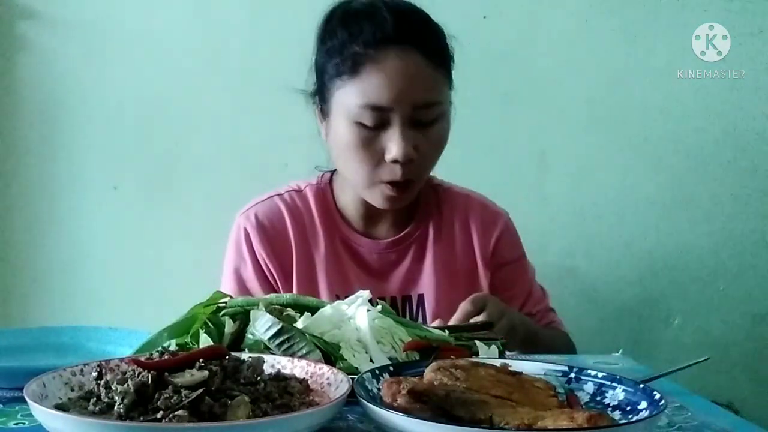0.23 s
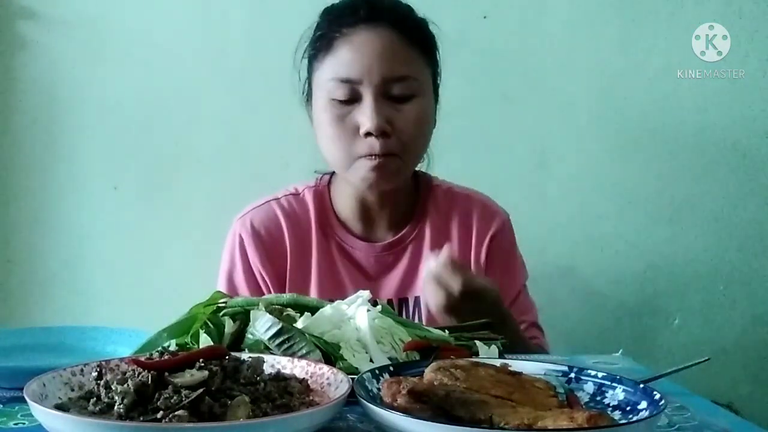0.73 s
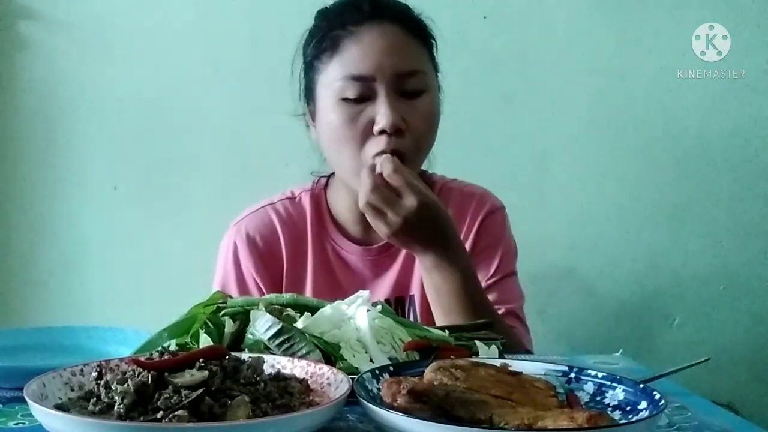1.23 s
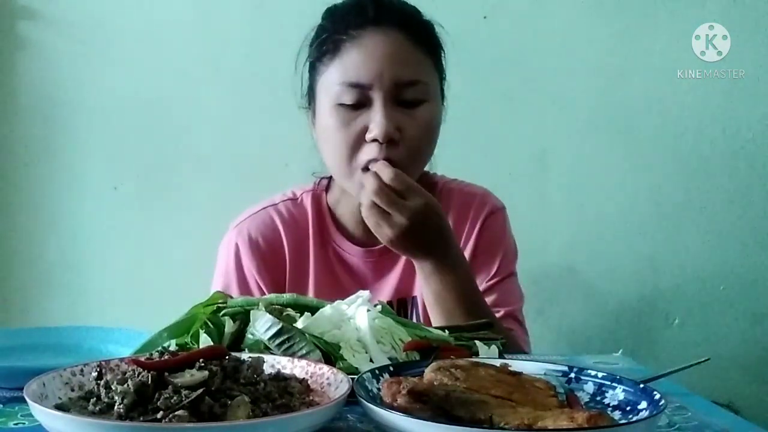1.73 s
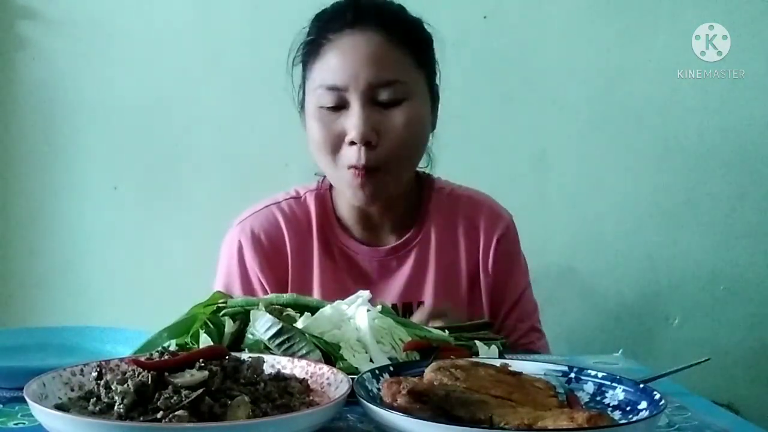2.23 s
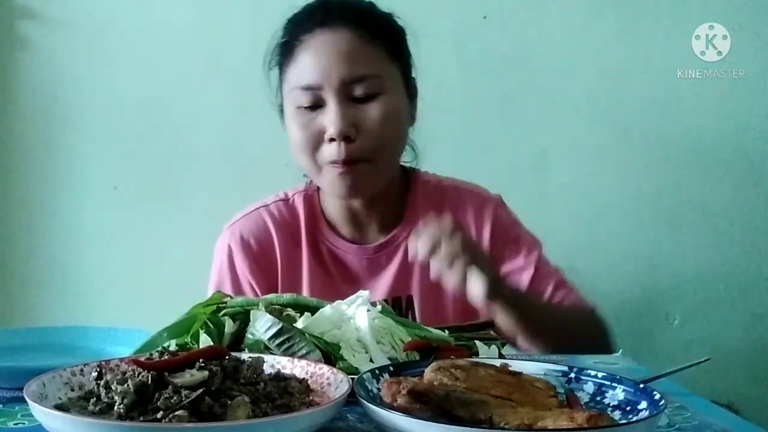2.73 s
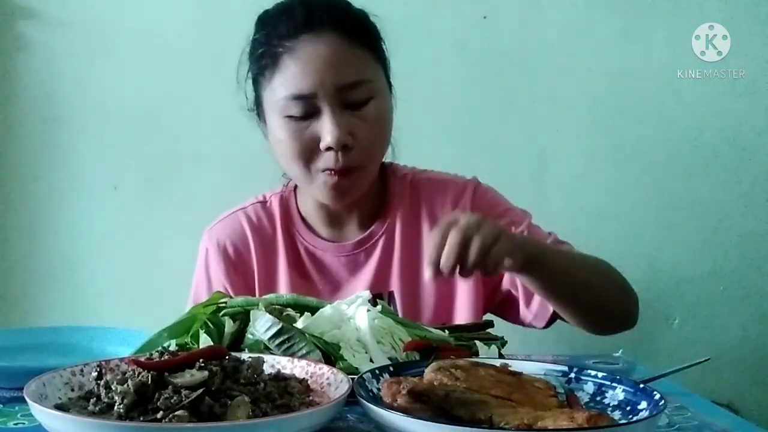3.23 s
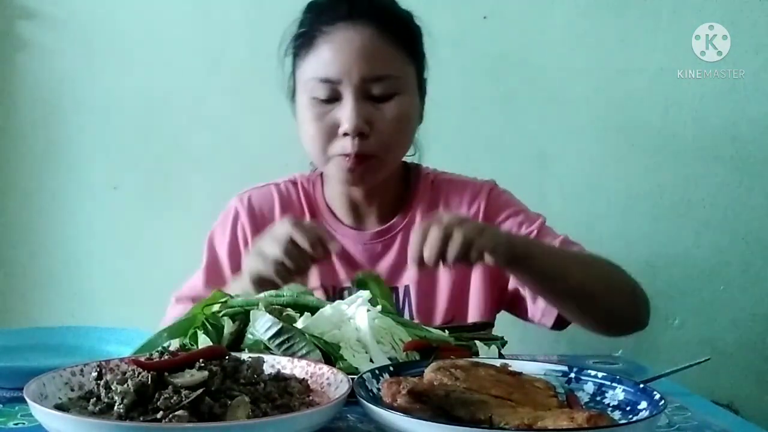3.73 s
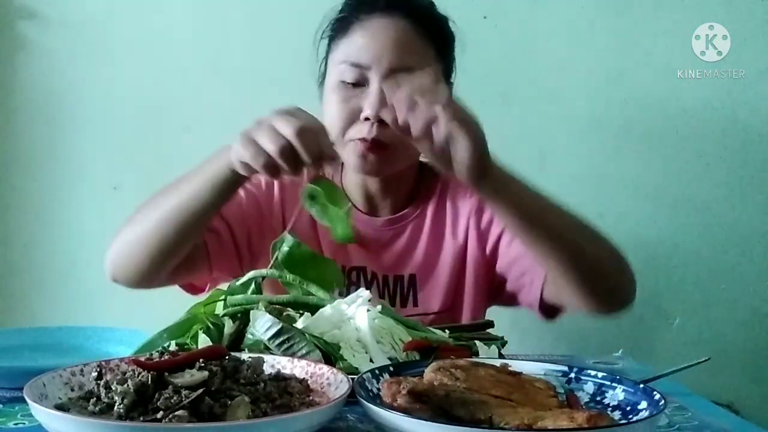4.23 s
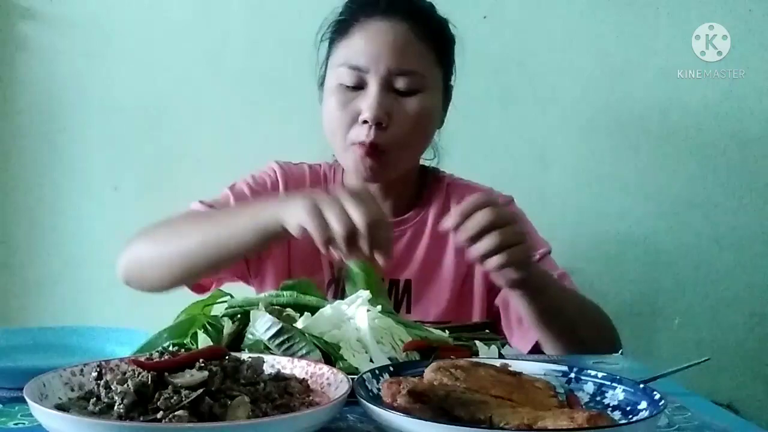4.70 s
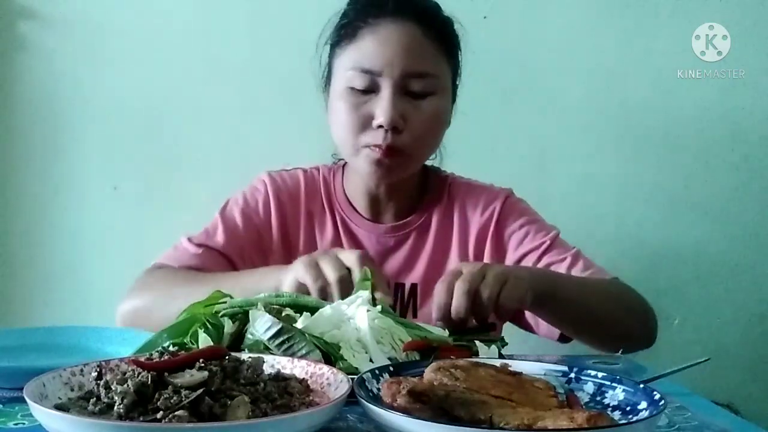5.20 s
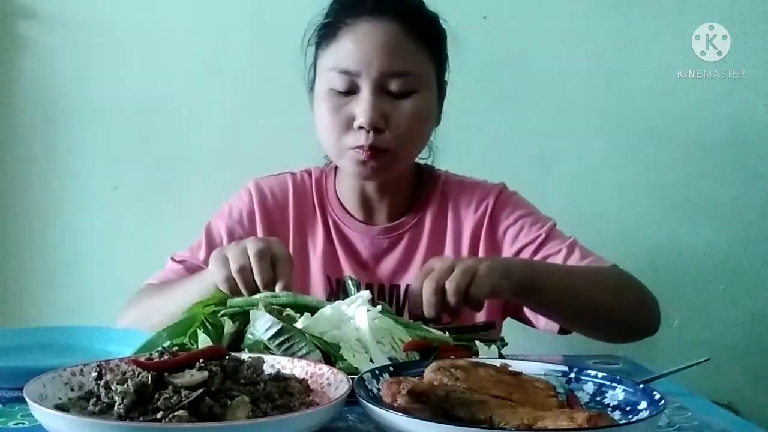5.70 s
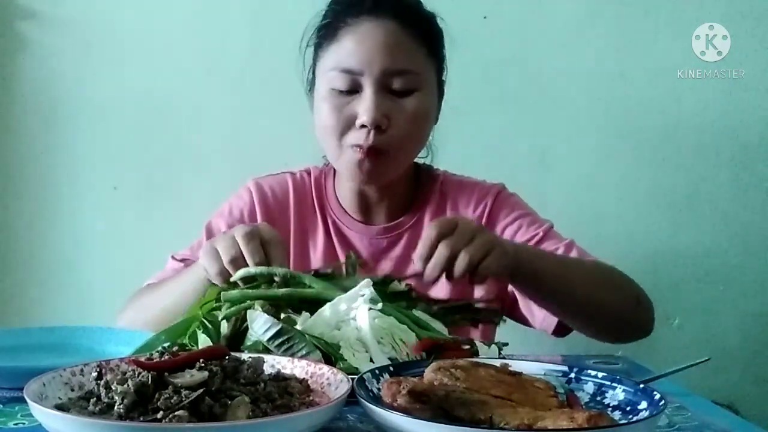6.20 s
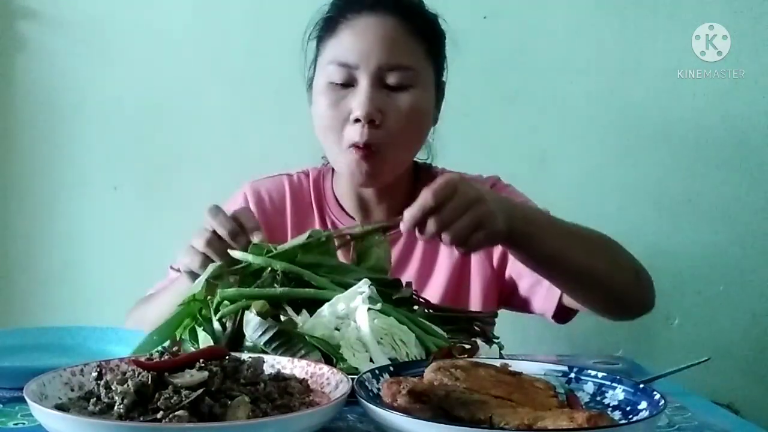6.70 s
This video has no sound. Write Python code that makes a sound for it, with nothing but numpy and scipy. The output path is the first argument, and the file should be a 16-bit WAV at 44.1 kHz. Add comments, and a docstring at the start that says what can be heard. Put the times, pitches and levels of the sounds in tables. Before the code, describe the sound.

Low outdoor air and a faint boomy engine open the scene, with one sharp click. The engine swells, eases, swells harder, then drops to a slow, lumpy idle coming through the walls. Leaves are brushed softly at a table, with tiny ticks and scuffs. Distant birds give thin rising slurs and hoarse falling calls. Small-room stereo pickup, quiet with gentle hiss.

```python
"""A small room, with a single-cylinder engine some way off outdoors: two swelling pulls, then it lets go and idles.
Each firing sums its orders to a boom through the walls, under a buzz of pipe overtones and puffs of gas noise.
A sharp click, soft ticks, a thin bird note and brief scuffs are damped pulses with a little noise.
Leaves rustle as strokes of shaped noise; far-off small birds whistle as gliding sines or rasp as falling noise bands.
Two ringing microphone ports pick it all up over outdoor air and a soft hiss, both shaped noise."""
import sys
import numpy as np
from scipy import signal
from scipy.fft import rfft, irfft, next_fast_len
from scipy.io import wavfile
from scipy.ndimage import uniform_filter1d, map_coordinates

SR = 44100
rng = np.random.default_rng(int(sys.argv[2]) if len(sys.argv) > 2 else 0)


def store_wav(level_fs):
    """Save 16-bit WAV to argv[1]."""
    pcm = np.round(np.clip(np.atleast_2d(level_fs), -1, 1) * 32767)
    wavfile.write(sys.argv[1], SR, pcm.T.astype(np.int16))


N = 306495
T = np.arange(N) / SR  # s


def amp(db):
    """Decibels to gain."""
    return 10 ** (np.asarray(db) / 20)


def unit(x):
    """Scale to rms 1."""
    return x / np.sqrt(np.mean(x ** 2) + 1e-20)


def steady(x):
    """Hold a stereo sound at rms 1 over quarter seconds."""
    power = uniform_filter1d(np.mean(x ** 2, axis=0), SR // 4)
    return x / np.sqrt(np.abs(power) + 1e-20)


def along(points, hz):
    """Read (f/Hz, value) points on a log frequency axis."""
    f, v = np.transpose(points)
    return np.interp(np.log(hz + 1), np.log(f + 1), v)


def curves(rows):
    """One value per sample for each column after the time."""
    s, *cols = np.transpose(rows)
    return [np.interp(T, s, c) for c in cols]


def wobble(rate):
    """A smooth random curve, rate knots a second."""
    knots = rng.standard_normal(int(N * rate / SR) + 4)
    return map_coordinates(knots, [T * rate + 1], order=2)


def swell(centre, length):
    """A rounded rise and fall."""
    return np.sqrt(np.clip(1 - (2 * (T - centre) / length) ** 2, 0, 1))


def filtered(x, response):
    """Filter x by a complex response of frequency."""
    m = next_fast_len(N + SR // 2)
    return irfft(rfft(x, m) * response(np.fft.rfftfreq(m, 1 / SR)), m)[..., :N]


def from_right(x):
    """Sound from outside reaches the right port first."""
    lag = 19 / SR  # s, left behind right
    sides = np.array([[1], [-1]])
    return filtered(x, lambda hz: np.exp(-1j * np.pi * hz * lag * sides))


def rush(spectrum):
    """Stereo noise of rms 1, alike in the bass and unrelated in the treble."""
    # Likeness of the two ports: f/Hz, correlation 0-1
    likeness = [(170, 0.95), (260, 1), (550, 0.97), (1200, 0.4), (2400, 0.37), (4000, 0.09), (7000, 0)]

    def mid_side(hz):
        turn = np.arccos(np.clip(along(likeness, hz), -1, 1)) / 2
        return amp(along(spectrum, hz)) * [np.cos(turn), np.sin(turn)]

    mid, side = filtered(rng.standard_normal((2, N)), mid_side)
    return unit(np.array([mid + side, mid - side]))


def coloured(x):
    """The room's many standing waves ripple the spectrum, differently at each port."""
    depth_db, spacing_hz = 2.6, 22
    knots = rng.standard_normal((2, SR // 8))
    grid = np.arange(knots.shape[1]) * spacing_hz

    def ripple(hz):
        random_db = depth_db * np.array([np.interp(hz, grid, row) for row in knots])
        return amp(random_db * np.clip(hz / 600, 0, 1))  # full depth from 600 Hz up

    return filtered(x, ripple)


def room(x):
    """The room's diffuse answer at both ports: decaying noise at the energy of x, after about 9 ms."""
    # Decay time of the room: f/Hz, t60/s
    decay = [(120, 0.27), (1000, 0.6), (3000, 0.39), (10000, 0.31)]
    hz, t, z = signal.stft(rng.standard_normal((2, SR // 2)), SR, nperseg=256)
    fading = z * amp(-60 * t / along(decay, hz)[:, None])
    tail = signal.istft(fading, SR, nperseg=256)[1]
    delayed = np.pad(x, (SR // 110, 0))[None]
    return signal.fftconvolve(delayed, tail / np.linalg.norm(tail[0]), axes=1)[:, :N]


def boom(cycle, speed, shake_db=0.6, echo_shake_db=1.04, boom_db=-0.46, skirt=1.62):
    """The silencer rings once per firing: the orders inside its band add up to a thump, which a wall repeats."""
    # The boom through the walls, which keep shifting its band, before trim and wall repeat:
    # t/s, level/dB, centre/Hz, half-width/Hz
    band = [(0.0, -39.5, 119, 27), (0.5, -41.5, 136, 18), (1.25, -41.5, 115, 52), (1.55, -31.5, 115, 7.3),
            (1.85, -27.5, 119, 7.6), (2.1, -32.5, 108, 17), (2.3, -36.5, 119, 47), (2.52, -36, 118.5, 25),
            (2.9, -26.5, 120, 11.2), (3.25, -25, 127.2, 10), (3.6, -25.5, 135.4, 8.9),
            (3.76, -27.5, 109, 9.7), (3.85, -31, 100, 11), (3.93, -38, 113, 81), (4.1, -29.5, 118, 19),
            (4.42, -28.5, 124, 30), (4.76, -32.5, 114.4, 27), (5.15, -28, 127.6, 58),
            (5.6, -27, 117.6, 13.3), (6.1, -31, 112, 39), (6.45, -31, 108.4, 14.8), (6.95, -29, 112, 13)]
    direct_db, all_echo_db = -31, -34.5  # the fainter the boom, the more of it is echo
    smear_rad = .45  # phase spread of the orders when it is all echo
    from_hz = 61  # the silencer radiates little below this
    wall_s, wall_db, wall_drift_s = 0.01816, -9.5, 0.0021  # delay, level, wander of the delay
    level_db, centre, width = curves(band)
    echo = np.clip((direct_db - level_db) / (direct_db - all_echo_db), 0, 1)
    orders = np.arange(3, 9)[:, None]  # multiples of the firing rate
    gains = 1 / (1 + np.abs((orders * speed - centre) / width) ** skirt)
    gains = gains / (1 + (from_hz / (orders * speed)) ** 6)
    # echoes delay the orders unequally around the band's centre, which widens each thump and makes it uneven
    spread = smear_rad * echo ** 2 * (orders - centre / speed) ** 2
    partials = gains * np.cos(2 * np.pi * orders * cycle + spread)
    thumps = -np.sqrt(2) * np.sum(partials, axis=0) / np.linalg.norm(gains, axis=0)
    wall = amp(wall_db) * np.interp(T - wall_s - wall_drift_s * wobble(1.995), T, thumps)
    shake = (shake_db + echo_shake_db * echo) * wobble(18)
    return (thumps + wall) * amp(level_db + boom_db + shake)


def pipe(hz, load):
    """Gain of the exhaust pipe's resonances along a pitch curve; the throttle shifts their balance."""
    # Resonances above the boom: centre/Hz, width/Hz, level under load/dB, level at idle/dB
    resonances = [(170, 16, -5, -8), (217, 24, -14, 3), (257, 18, 0, -14), (276, 18, -18, -1),
                  (335, 24, -5, -12), (362, 26, -14, -8), (400, 18, -4, -28), (432, 20, -22, -14),
                  (472, 24, -3, -12), (505, 20, -13, -22), (541, 22, -4, -10), (585, 35, -28, -13),
                  (640, 50, -14, -17), (705, 30, -14, -28), (790, 45, -12, -15)]
    grid = np.arange(SR // 20)  # Hz
    power = 0
    for centre, width, loaded_db, idle_db in resonances:
        power = power + amp([[loaded_db], [idle_db]]) ** 2 / (1 + (2 * (grid - centre) / width) ** 2)
    loaded, idle = np.sqrt(power)
    return load * np.interp(hz, grid, loaded) + (1 - load) * np.interp(hz, grid, idle)


def overtones(cycle, speed, load, orders, waver_db=4.5, port_db=1.25, drift=0.18, idle_drift=0.47, apart=0.22):
    """Higher orders sweep through the pipe's resonances; shifting echoes make each fade on its own."""
    # A resonance that wanders over the overtones: t/s, centre/Hz
    upper_hollow = [(1.5, 464), (1.95, 360), (2.15, 515), (2.55, 520), (2.85, 463), (3.25, 486),
                    (3.55, 351), (3.9, 370), (4.15, 497), (4.35, 552), (4.75, 560), (4.95, 480),
                    (5.45, 466), (5.85, 548), (6.5, 573)]
    # A second one, lower down: t/s, centre/Hz
    lower_hollow = [(2.1, 229), (2.8, 249), (3.3, 244), (3.6, 170), (4.2, 218), (4.8, 226), (5.1, 282),
                    (5.4, 280), (5.75, 217), (6.95, 217)]
    hollow_db, hollow_width = 7, .075  # lift, half-width as a share of the centre
    idle_scatter_rad, load_scatter_rad = 1.05, 1.4  # how far the orders start out of step
    stumble_rad = 1.0  # the firings turn ragged while the throttle closes
    out = np.zeros((2, N))
    hollows = curves(upper_hollow) + curves(lower_hollow)
    # less scatter at idle leaves each firing a soft knock
    scatter = load * load_scatter_rad + (1 - load) * idle_scatter_rad
    drift_rad = load * drift + (1 - load) * idle_drift
    sides = np.array([[1], [-1]])
    for k in orders:
        lift_db = sum(hollow_db / (1 + ((k * speed / hz - 1) / hollow_width) ** 2) for hz in hollows)
        level = pipe(k * speed, load) * amp(lift_db + waver_db * wobble(2.497))
        phase = 2 * np.pi * k * cycle + scatter * rng.standard_normal() + drift_rad * wobble(9)
        phase += stumble_rad * np.sin(np.pi * load) ** 2 * wobble(24)
        balance = amp(port_db * rng.standard_normal() * sides)
        out += level * balance * np.cos(phase + apart * rng.choice([-1, 1]) * sides)
    return out


def engine(far_db=-5, buzz_db=0.84, drone_lead=0.131):
    """Each firing gives a thump, a buzz of overtones and a puff of gas noise."""
    # Climbs under load, sags when the throttle shuts and settles at idle: t/s, firing rate/Hz
    revs = [(0, 20.31), (.4, 20.57), (.9, 20.65), (1.6, 21.53), (2, 22.1), (2.25, 22.35), (2.45, 22.65),
            (2.62, 22.6), (2.85, 23.1), (3.2, 23.65), (3.62, 24.05), (3.75, 22.3), (3.9, 19.8),
            (4.05, 18.6), (4.4, 18.87), (5.5, 18.8), (6, 19), (6.95, 18.6)]
    # Throttle: t/s, load 0-1
    throttle = [(3.65, 0.95), (4.05, 0)]
    # Gas noise spectrum: f/Hz, level/dB
    puff_spectrum = [(100, -20), (200, 0), (400, -1), (560, -4), (660, -9), (820, -9), (900, -20),
                     (1050, -16), (1400, -25), (3000, -43), (8000, -100)]
    # Edges of the exhaust's low, middle and high band above the boom, then its rasp: f/Hz
    edges = [150, 300, 505, 730, 16000]
    # Those three bands before the buzz trim and fade-up: t/s, low level/dB, middle level/dB, high level/dB
    effort = [(0.05, -67, -74, -61), (0.31, -48.5, -70, -67), (1.27, -57, -50, -65),
              (1.42, -54, -55, -66.5), (2.49, -48.5, -50, -52.5), (2.74, -41, -48.5, -55.5),
              (3.11, -45, -44.5, -50.5), (3.88, -49.5, -47, -58), (3.98, -57, -53.5, -65),
              (4.09, -43, -50, -57), (4.2, -46, -48.5, -49), (5.43, -45.5, -50, -54),
              (6.25, -48.5, -53.5, -49.5), (6.78, -50.5, -56.5, -57), (6.8, -54, -54.5, -55.5)]
    # The rasp at the top, likewise: t/s, level/dB
    rasp_level = [(1.3, -85), (1.85, -61.5), (2.5, -60), (3.5, -62), (4, -82), (4.4, -65), (4.8, -67.5),
                  (5.3, -56), (6.4, -58), (6.95, -73)]
    first_firing, bark_delay = .41, .05  # cycles: after the start; upper overtones behind the thump
    puff_db, puff_load_db = -12, -7  # gas noise against the overtones at idle, its change under load
    idle_swing_db, load_swing_db = 3, 1.5  # gas noise peaks at each firing and sinks between them

    speed, = curves(revs)
    load, = curves(throttle)
    cycle = np.cumsum(speed) / SR - first_firing
    swing_db = load * load_swing_db + (1 - load) * idle_swing_db
    puffs = unit(coloured(rush(puff_spectrum)) * amp(swing_db * np.cos(2 * np.pi * cycle)))
    # ranges are multiples of the firing rate; the drone leads at idle
    drone = overtones(cycle + drone_lead * (1 - load), speed, load, range(9, 15))
    bark = overtones(cycle - bark_delay, speed, load, range(15, 45))
    exhaust = steady(drone + bark) + amp(puff_db + puff_load_db * load) * puffs
    buzz = 0
    for lo, hi, db in zip(edges, edges[1:], curves(effort) + curves(rasp_level)):
        band = filtered(exhaust, lambda hz: (hz >= lo) & (hz < hi))
        buzz = buzz + amp(db + buzz_db) * steady(band)
    # the buzz starts half buried in the outdoor air and comes up over two seconds
    near = amp(far_db * np.clip(1 - T / 2, 0, 1))
    return boom(cycle, speed) + near * buzz


def background(hiss_db=1):
    """Low outdoor air, and a smooth hiss that swells with the revs and briefly dips: two shaped noises."""
    # Outdoor air spectrum: f/Hz, level/dB
    air_spectrum = [(10, -2), (28, 4), (55, -4.5), (100, -6), (200, -15.5), (300, -14), (450, -17.5),
                    (680, -17), (1050, -22), (1700, -33.5), (3000, -53), (8000, -95)]
    # Outdoor air before its random wavering: t/s, level/dB
    air_level = [(0, -39.5), (.9, -42), (1.5, -47.5), (2.4, -46.5), (3.4, -42), (4.2, -49.5), (6.95, -47)]
    # Hiss spectrum: f/Hz, level/dB
    hiss_spectrum = [(300, 12), (900, 4), (1800, 5.5), (2500, 6), (4300, 1.5), (5500, -5.5), (7500, -14),
                     (10500, -20.5), (12000, -27), (15000, -29)]
    # Hiss before trim and dips: t/s, level/dB
    hiss_level = [(0, -59.5), (.9, -63), (1.2, -65), (1.55, -61), (1.9, -62), (2.7, -55.5), (3.55, -51),
                  (3.75, -54.5), (3.97, -61), (4.15, -56.5), (4.3, -58.5), (4.6, -55.5), (5.9, -57),
                  (6.95, -57.5)]
    # The hiss drops away briefly: start/s, end/s, change/dB
    dips = [(1.086, 1.117, -19.5), (1.257, 1.452, -18), (1.463, 1.553, -11.5)]
    air_db, = curves(air_level)
    level_db, = curves(hiss_level)
    dip_db = sum(db * ((T > start) & (T < end)) for start, end, db in dips)
    soft_dip_db = uniform_filter1d(dip_db * 1., SR // 80)
    hiss = amp(level_db + hiss_db + soft_dip_db) * rush(hiss_spectrum)
    air = amp(air_db + wobble(6.26)) * rush(air_spectrum)
    return coloured(hiss + air)


def short_sounds(room_db=0, soft_hz=6500):
    """Each is one damped pulse with a sharp edge, a brief ring and a little grit, answered by the room."""
    # Short clicks, ticks, a thin bird note and brief rustling scuffs, levels before softening and room:
    # t/s, pulse peak level/dB, ring f/Hz, t60/s, grit share
    moments = [(0.2983, -25, 2580, 0.017, 0.2), (0.3208, -42, 1320, 0.033, 0.1),
               (1.13, -57.5, 8400, 0.0084, 0.42), (2.779, -47, 3650, 0.056, .4),
               (3.458, -44, 4160, 0.022, 0.69), (4.115, -50.5, 6750, 0.011, 0.47),
               (4.169, -50, 2500, 0.02, .5), (4.561, -49, 6100, 0.0087, .5),
               (6.079, -50.5, 8540, 0.0061, .7), (6.106, -48, 2600, 0.03, 0.7),
               (6.117, -47, 2385, 0.05, 0.54), (6.54, -48.5, 1470, 0.027, 0.47),
               (6.675, -50, 2380, .015, 0.46)]
    edge_share, ring_db = .07, -3  # bright edge and ring against the pulse
    out, t = np.zeros(N + SR), np.arange(SR // 10) / SR
    impulse = 1. * (t == 0)
    for s, db, hz, t60, grit in moments:
        body = signal.butter(2, [.94 * hz, 1.22 * hz], "band", fs=SR)
        wide = signal.butter(2, [.8 * hz, 1.7 * hz], "band", fs=SR)
        pulse = signal.lfilter(*body, impulse)
        pulse = pulse / np.abs(pulse).max()
        edge = signal.lfilter(*wide, impulse)
        edge = edge / np.abs(edge).max()
        noise = unit(signal.lfilter(*body, rng.standard_normal(len(t)))) * amp(-60 * t / t60)
        ring = amp(ring_db - 60 * t / t60) * np.sin(2 * np.pi * hz * t)
        out[round(s * SR):][:len(t)] += amp(db) * (pulse + edge_share * edge + grit * noise - ring)
    dry = filtered(out[:N], lambda hz: 1 / (1 + 1j * hz / soft_hz) ** 2)
    return dry + amp(room_db) * room(dry)


def bird(direct_db=-7, room_db=-5, peep_length=0.035, quaver=0.014, flutter_db=2):
    """An upward slur that quavers and holds its top note, after a brief peep: sines with a room echo."""
    # Rising whistles, before direct and room gains: t/s, level/dB, top f/Hz
    whistles = [(.782, -63.5, 5370), (2.366, -58.5, 5670), (4.018, -58, 5950), (5.205, -64, 6050),
                (6.42, -62, 5380)]
    # Pitch of the slur: t into the whistle/s, f/Hz
    glide = [(0, 4360), (0.044, 4800), (.08, 5500), (.115, 6400)]
    # A short two-toned call and its faint repeat, before the same gains: t/s, f/Hz, level/dB
    peeps = [(.645, 4660, -61), (.645, 6520, -66.5), (.725, 4640, -72)]
    when, pitch = np.transpose(glide)
    length = when[-1]
    song = np.zeros(N)
    for s, db, top_hz in whistles:
        slur = np.minimum(np.interp(T - s, when, pitch), top_hz)
        phase = 2 * np.pi * np.cumsum(slur * (1 + quaver * wobble(150))) / SR
        song += amp(db + flutter_db * wobble(60)) * swell(s + length / 2, length) * np.sin(phase)
    for s, hz, db in peeps:
        tone = np.sin(2 * np.pi * hz * T + wobble(360))
        song += amp(db) * swell(s + peep_length / 2, peep_length) * tone
    return amp(direct_db) * song + amp(room_db) * room(song)


def hoarse_bird(direct_db=-9, room_db=-1, quaver=0.01236):
    """A rough band slides down around a thin tone that comes out late in the call; it arrives mostly as echo."""
    # Hoarse falling calls, before direct and room gains: t/s, length/s, level/dB
    calls = [(1.55, 0.16, -58), (2.629, 0.2, -58), (5.39, .22, -58), (6.19, .23, -54.5)]
    fall_from_hz, fall_to_hz = 4700, 3384  # centre of the band
    half_width_hz, rough_db = 1100, 4
    core_from_hz, core_to_hz, core_db = 4000, 3490, -9  # the thin tone
    song = np.zeros(N)
    noise = filtered(rng.standard_normal(N), lambda hz: 1 / (1 + (hz / half_width_hz) ** 4))
    rasp = unit(noise) * amp(rough_db * wobble(90))
    for s, length, db in calls:
        through = np.clip((T - s) / length, 0, 1)
        band_hz = fall_from_hz + (fall_to_hz - fall_from_hz) * np.sqrt(through)
        core_hz = core_from_hz + (core_to_hz - core_from_hz) * through
        core_hz = core_hz * (1 + quaver * wobble(150))
        phases = 2 * np.pi * np.cumsum([band_hz, core_hz], axis=1) / SR
        band, core = np.sqrt(2) * np.sin(phases)
        voice = rasp * band + 2 * amp(core_db) * through * core
        song += amp(db) * swell(s + length / 2, length) ** 2 * voice
    return amp(direct_db) * song + amp(room_db) * room(song)


def leaves(grain_db=3.0, crackle_db=-3.0, crackle_rate=60):
    """Soft strokes of fine, uneven friction, with tiny crackles of the stems."""
    # Leaves brush and slide: t/s, length/s, level/dB
    rustles = [(2.937, 0.23, -67), (3.204, 0.092, -58), (3.536, 0.58, -58), (3.757, 0.16, -62.5),
               (4.535, 0.28, -61), (6.114, .06, -62)]
    # Friction spectrum: f/Hz, level/dB
    leaf_spectrum = [(1200, -17), (2500, 7), (3700, 7), (4800, 2), (6000, -8), (10000, -47), (15000, -52)]
    strokes = sum(amp(db) * swell(s, length) for s, length, db in rustles)  # centred on t
    snaps = (rng.random(N) < crackle_rate / SR) * rng.standard_normal(N)
    # the snaps are brighter than the sliding
    bright = filtered(snaps, lambda hz: amp(along(leaf_spectrum, hz) / 2) * (hz > leaf_spectrum[0][0]))
    crackle = strokes * amp(crackle_db) * unit(bright)
    sliding = strokes * unit(coloured(rush(leaf_spectrum)) * amp(grain_db * wobble(70)))
    return sliding + (crackle + room(crackle)) / 2


def scene():
    """The engine and air from outside, the short sounds, the birds and the leaves."""
    outside = from_right(engine() + background())
    return outside + short_sounds() + bird() + hoarse_bird() + leaves()


def record(dry):
    """Each port rings at its own treble resonance; nothing passes the band limit."""
    # Left and right port resonance: centre/Hz, half-width/Hz, lift/dB
    ports = [(7550, 1320, 16.5), (10620, 1970, 20)]
    top_hz = 15450

    def response(hz):
        lifts = [amp(db / (1 + ((hz - centre) / width) ** 2)) for centre, width, db in ports]
        return np.array(lifts) * (hz < top_hz)

    return filtered(dry, response)


dry = scene()
out = record(dry)
store_wav(out)
```